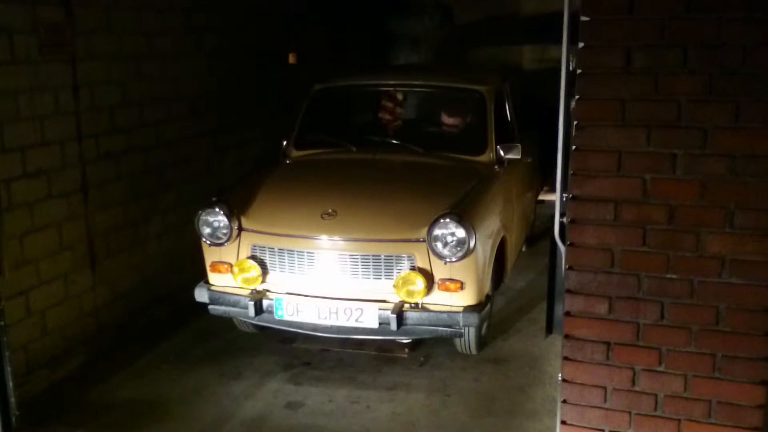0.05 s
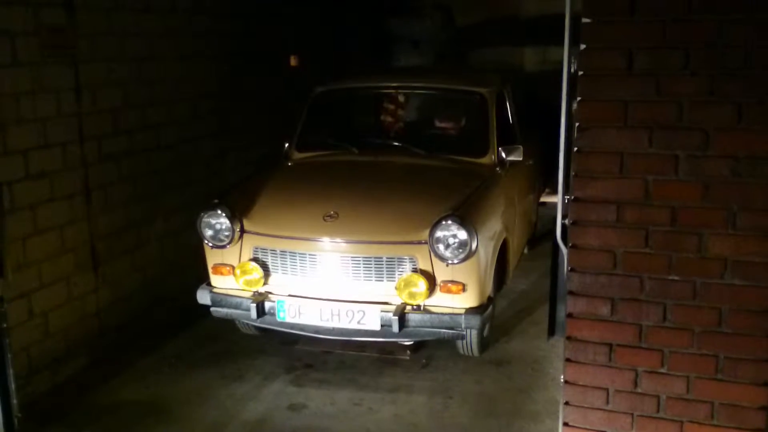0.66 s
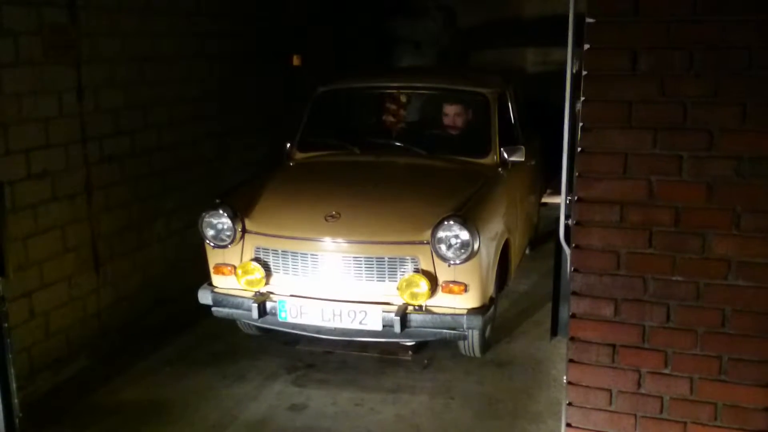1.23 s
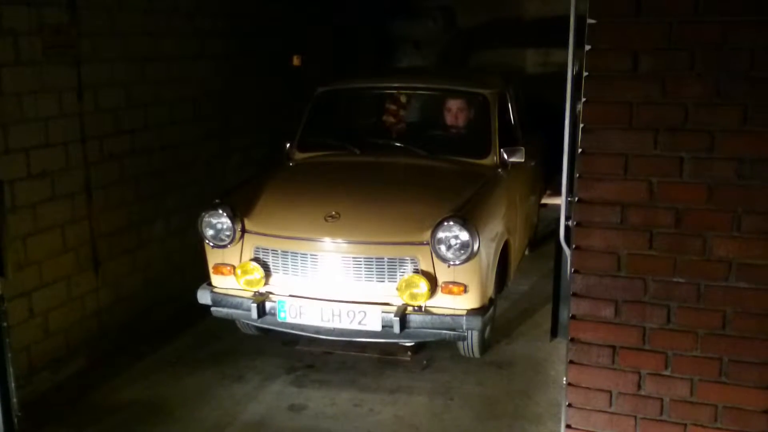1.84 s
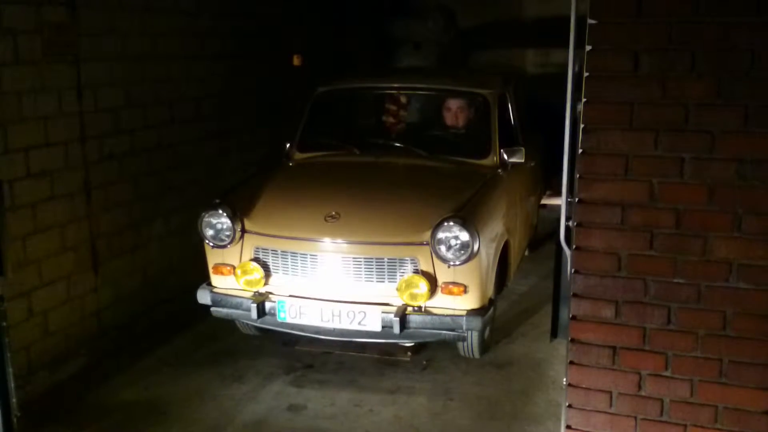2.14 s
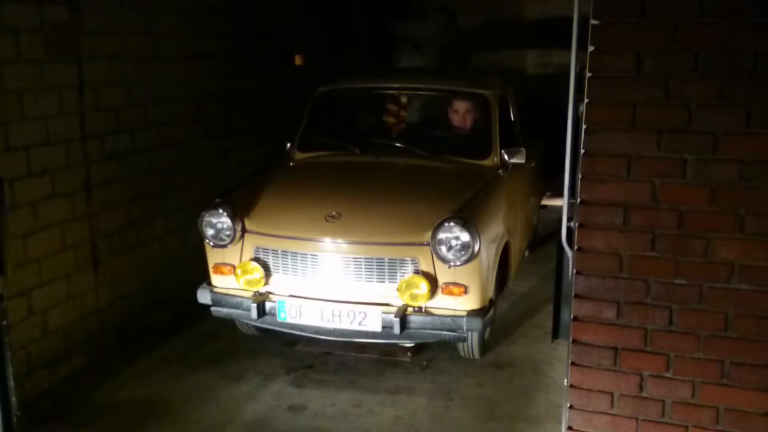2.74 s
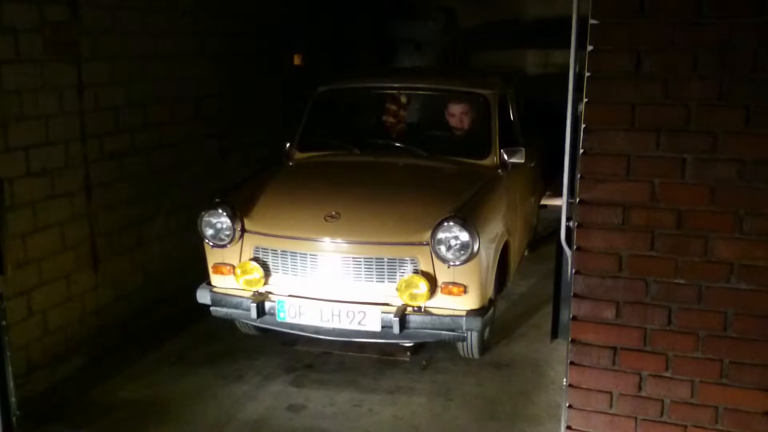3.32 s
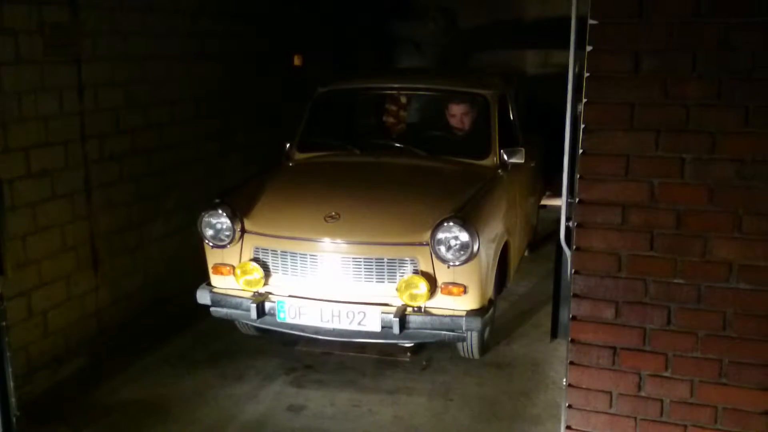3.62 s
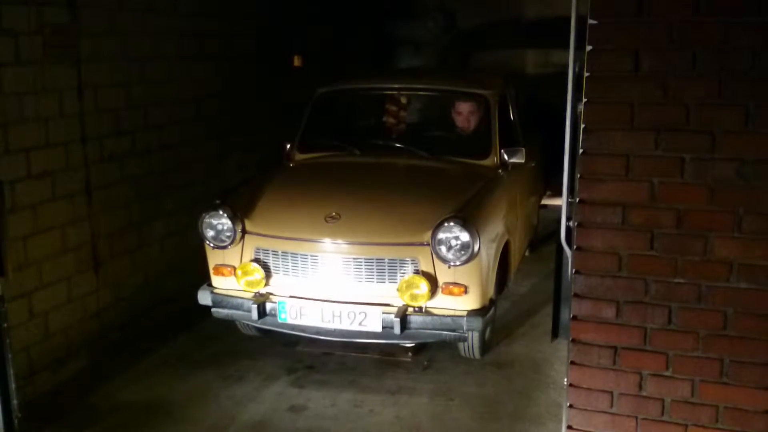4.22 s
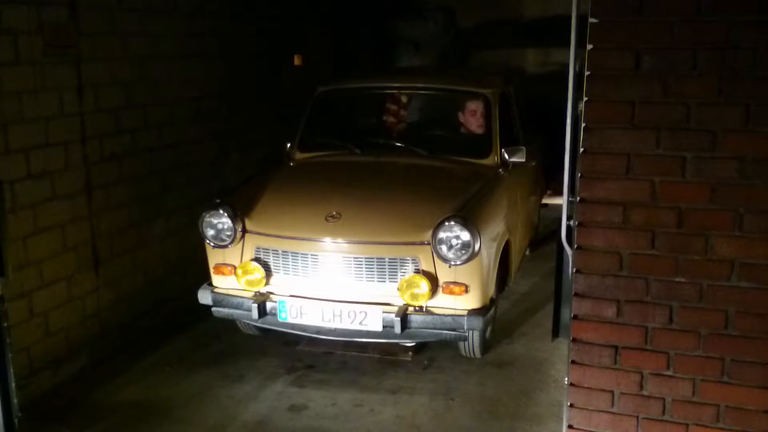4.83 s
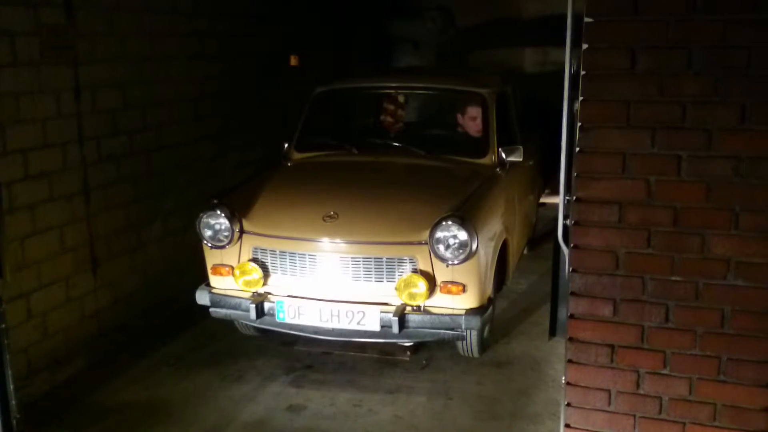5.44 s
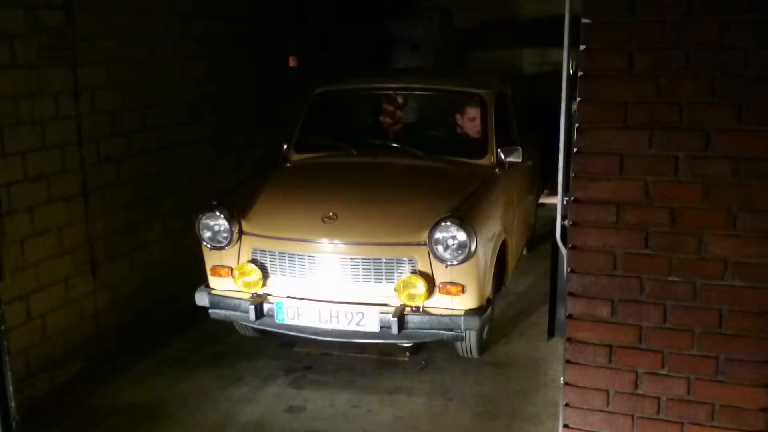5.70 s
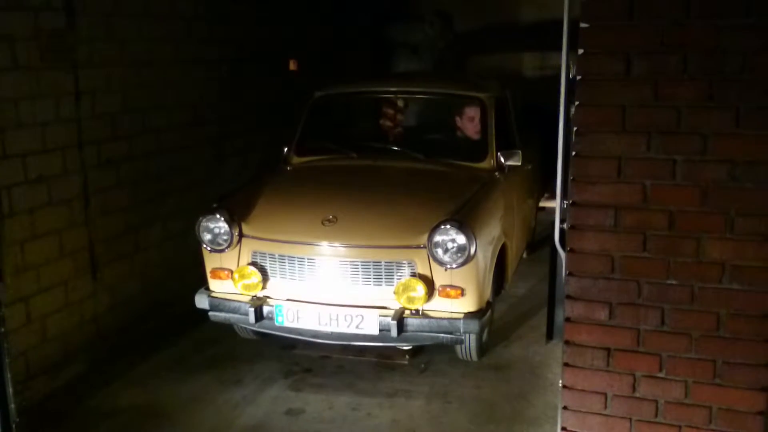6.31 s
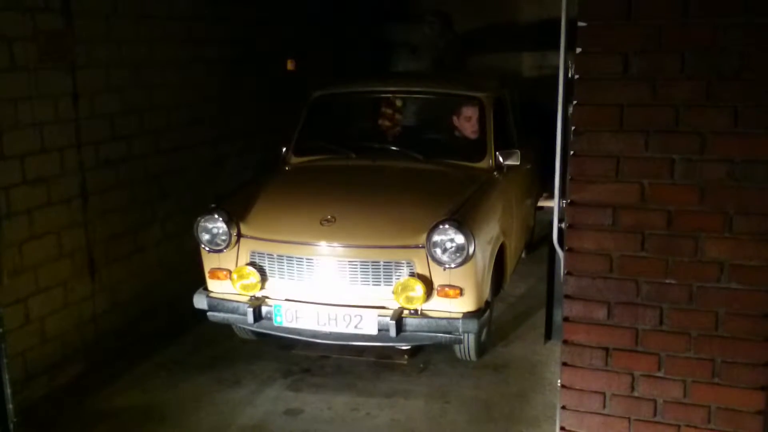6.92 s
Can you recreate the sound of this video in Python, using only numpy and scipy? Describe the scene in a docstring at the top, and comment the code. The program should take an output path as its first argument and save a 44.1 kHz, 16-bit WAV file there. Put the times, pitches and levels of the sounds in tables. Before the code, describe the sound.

A ventilator hums softly in a narrow brick garage. After about two seconds, an old small car's starter clashes and grinds three times in quick succession. The two-stroke engine stumbles and clatters, coughs once, then catches and revs up. It eases back to a fast idle, with irregular firings shaking out short, tinny rattles over the exhaust drone. Heard from nearby, with short reflections off the walls.

```python
"""Two-stroke cold start in a garage

A ventilator hums in a narrow brick garage. A starter crashes in, and an old air-cooled two-stroke twin
stumbles, clatters, catches, revs up and settles to a fast idle. Exhaust pulses, fan tones and rocking
follow the firing rate. Only some strokes ignite: each of those jolts excites the resonances of the
engine's thin metal, a short tinny rattle that reverberates between the walls."""
import sys
import numpy as np
from scipy import signal
from scipy.fft import rfft, irfft
from scipy.io import wavfile
from scipy.ndimage import uniform_filter1d

SR = 44100
rng = np.random.default_rng(int(sys.argv[2]) if len(sys.argv) > 2 else 0)


def transcribe(signal):
    """Save signal, clipped to [-1, 1], as a 16-bit WAV file at the path in sys.argv[1]."""
    frames = np.atleast_2d(signal).T
    limited = np.clip(frames, -1, 1)
    pcm = np.round(limited * 32767).astype(np.int16)
    wavfile.write(sys.argv[1], SR, pcm)


N = 306936
TIME = np.arange(N) / SR
HZ = np.arange(32769) * SR / 65536


def undb(db):
    """Decibels to amplitude ratio."""
    return 10 ** (np.asarray(db) / 20)


def unit(x):
    """Normalisation to rms 1."""
    return x / np.sqrt(np.mean(x ** 2))


def curve(rows):
    """Linear interpolation of (time, value) rows."""
    return np.interp(TIME, *np.transpose(rows))


def burst(start, rise_s, hold_s, fall_s):
    """Linear attack, then exponential decay from hold_s after the start."""
    age = np.maximum(TIME - start, 0)
    return np.minimum(age / rise_s, 1) * np.exp(-np.maximum(age - hold_s, 0) / fall_s)


def drift(rate_hz):
    """Slow random modulation: smoothed steps, rms 1."""
    k = int(SR / rate_hz)
    steps = np.repeat(rng.standard_normal(N // k + 1), k)
    return unit(uniform_filter1d(uniform_filter1d(steps, k), k)[:N])


def impacts(rate_hz, spread_db):
    """Shot noise: random contacts of log-normal strength, rms 1."""
    contacts = (rng.random(N) < rate_hz / SR) * rng.choice([-1, 1], N)
    return unit(contacts * undb(spread_db * rng.standard_normal(N)))


def shape(points, modes=()):
    """Frequency response in dB: Lorentzian resonances on a broad spectrum."""
    hz, db = np.transpose(points)
    broad = np.interp(np.log(HZ + 1), np.log(hz), db)
    return broad + sum(peak / (1 + (2 * (HZ - f) / width) ** 2) for f, width, peak in modes)


def colour(x, db):
    """Minimum-phase filtering, built from the cepstrum of the response."""
    cepstrum = irfft(np.log(undb(db)))
    cepstrum[1:len(HZ) - 1] *= 2
    cepstrum[len(HZ):] = 0
    response = irfft(np.exp(rfft(cepstrum)))[:16384]
    return signal.fftconvolve(x, response)[:N]


def noise(db):
    """Gaussian noise with the given spectrum."""
    return colour(rng.standard_normal(N), db)


def metal(force, db):
    """Forced vibration: contacts ring a metal part, keeping their power."""
    return colour(force, db) / np.sqrt(np.mean(undb(db) ** 2))


def cohere(pair, split_hz):
    """Spatial coherence: long waves reach two close microphones alike."""
    mid, side = rfft(pair)
    alike = 1 / (1 + (np.linspace(0, SR / 2, len(mid)) / split_hz) ** 2)
    mid, side = mid * np.sqrt(1 + alike), side * np.sqrt(1 - alike)
    return irfft([mid + side, mid - side], len(pair[0])) / np.sqrt(2)


def garage(x, direct, early_s, late_s, late_db):
    """Reverberation: direct sound, dense reflections off near walls and a duller tail."""
    t = TIME[:SR // 2]
    early, late = (cohere(rng.standard_normal((2, len(t))), split_hz=1560) for _ in range(2))
    late = signal.sosfilt(signal.butter(1, 4000, fs=SR, output="sos"), late)
    response = early * undb(-60 * t / early_s) + late * undb(late_db - 60 * t / late_s)
    response = unit(response) / np.sqrt(len(t))
    response[:, 0] += direct
    return signal.fftconvolve(x[None], response, axes=1)[:, :N] / np.sqrt(1 + direct ** 2)


# ventilator air spectrum: (frequency [Hz], relative level [dB])
AIR_SPECTRUM = [(25, -2.5), (50, -13.5), (80, -9.5), (130, 3), (170, -10), (300, -13.5), (420, -18.5),
                (720, -19.5), (900, -21), (1150, -20), (1600, -22.5), (2600, -25), (4500, -31),
                (6100, -28.5), (7500, -36.5), (15800, -54)]
# duct resonances: (frequency [Hz], width [Hz], gain [dB])
DUCT_MODES = [(138, 18, -8.5), (840, 36, 12.5), (958, 100, 12.5), (2270, 270, 7), (3460, 480, 6),
              (6000, 1200, 5.5)]
# ventilator tones: (multiple of shaft speed [-], rms level [dB])
HUM_TONES = [(16, -40), (19, -48), (20, -47), (21, -51), (44, -60), (123, -56), (143, -56), (162, -65)]
SHAFT_HZ, AIR_DB, LEFT_LEAD_S = 6.665, -41.5, 0.00021

def ventilator():
    """Beating: neighbouring shaft harmonics throb over broadband flow noise."""
    air = unit(cohere([noise(shape(AIR_SPECTRUM, DUCT_MODES)) for _ in range(2)], split_hz=440))
    shaft_turns = SHAFT_HZ * (TIME + np.array([[LEFT_LEAD_S], [0]]))
    hum = 0
    for k, db in HUM_TONES:
        amplitude = np.sqrt(2) * undb(db + 0.26 * drift(5))
        hum += amplitude * np.sin(2 * np.pi * (k * shaft_turns + rng.random()) + 0.09 * drift(3))
    return air * undb(AIR_DB) + hum


# the engine is turned over briefly, then stumbles at low speed: (time [s], stroke rate [Hz])
STUMBLING_RATE = [(2.05, 5.8), (2.35, 11), (2.85, 12), (3.1, 17), (3.3, 16), (3.48, 19.2)]
# it catches, revs up and settles: (time [s], stroke rate [Hz])
RUNNING_RATE = [(3.55, 31.4), (3.8, 42.77), (4.1, 51.34), (4.33, 70.0), (4.45, 72.34), (4.98, 68.9),
                (5.1, 70.43), (5.47, 67.57), (5.69, 60.5), (6.88, 59.38), (6.96, 58.6)]

def stroke_phase():
    """Phase as the integral of frequency: one cycle per stroke."""
    return np.cumsum(curve(list(STUMBLING_RATE) + list(RUNNING_RATE))) / SR


def stroke_hz(strokes):
    """Instantaneous frequency: the derivative of phase."""
    return np.gradient(strokes) * SR


# one push on the accelerator: (time [s], opening [0-1])
THROTTLE_OPENING = [(3.52, 0.1), (3.6, 0.8), (4.22, 1), (4.5, 0)]
IDLE_HZ = 60

def effort(strokes, idle_db, doubling_db, throttle_db):
    """Power law: level changes by doubling_db per doubling of speed, and rises with throttle."""
    doublings = np.log2(stroke_hz(strokes) / IDLE_HZ)
    return undb(idle_db + doubling_db * doublings + throttle_db * curve(THROTTLE_OPENING))


# narrow, fixed-pitch peaks in the engine's drone: (frequency [Hz], width [Hz], gain [dB])
DRONE_PEAKS = [(178, 14, 4), (352, 14, 5), (416, 14, 9), (484, 20, 4), (555, 22, 5), (595, 30, 4)]
# cooling fan tones: (multiple of stroke rate [-], relative level [dB])
FAN_TONES = [(3, -5), (5, -15), (6, -10), (7, -5.5), (8, 1), (9, -9), (10, -9)]

def fan(strokes):
    """Aerodynamic noise: ragged harmonics of engine speed over the rush in the cooling ducts."""
    tones = unit(sum(undb(db + 4.5 * drift(22)) * np.sin(2 * np.pi * k * strokes + 0.9 * drift(30))
                     for k, db in FAN_TONES))
    rush = unit(noise(shape([(200, -25), (350, -3), (650, -3.5), (780, -14), (1000, -0.5), (2000, -52)])))
    spinning = np.clip((stroke_hz(strokes) - 30) / 25, 0, 1)
    air = tones * spinning + rush * np.maximum(spinning, 0.76)  # only the rush stays at low speed
    air = unit(colour(air, shape([(100, 0), (1000, 0)], DRONE_PEAKS)))
    return air * effort(strokes, idle_db=-36.5, doubling_db=8, throttle_db=4.4)


# jolts of the pinion and of single ignitions: (time [s], relative level [dB], hold [s])
JOLT_EVENTS = [(2.074, -17, 0.0046), (2.243, -20, 0.026), (2.38, -17, 0.013), (2.403, -19.5, 0.026),
               (2.542, -18, 0.01), (2.743, -18.5, .014), (2.936, -22.5, 0.038), (3.03, -16, 0.0069),
               (3.1, -23, 0.048), (3.358, -17, .024), (3.432, -19, .02), (3.546, -15.5, .022),
               (3.592, -17.5, 0.053), (3.713, -16, 0.015), (3.794, -18.5, 0.07), (4.001, -24.5, 0.018),
               (4.081, -20.5, 0.028), (4.571, -12, 0.042), (4.742, -12, 0.023), (4.79, -13, .02),
               (4.922, -11, 0.044), (4.995, -12, 0.042), (5.083, -11, .024), (5.257, -11.5, .043),
               (5.409, -14.5, 0.022), (5.486, -11.5, 0.019), (5.628, -15, 0.019), (5.677, -13.5, 0.017),
               (5.82, -13.5, 0.025), (5.874, -14, 0.015), (5.981, -17.5, 0.021), (6.035, -13.5, 0.018),
               (6.203, -13.5, 0.041), (6.27, -20, 0.02), (6.386, -15.5, 0.018), (6.471, -21, 0.023),
               (6.59, -17.5, 0.018), (6.64, -13.5, 0.019), (6.796, -14.5, .039), (6.93, -17, 0.023)]

def jolt_power(rise_s, fall_s, gain_db):
    """Incoherent addition: the decaying vibrations of the jolts sum in power."""
    return sum((undb(db + gain_db) * burst(start, rise_s, hold_s, fall_s)) ** 2
               for start, db, hold_s in JOLT_EVENTS)


def shaking(strokes):
    """Resonance: the engine sways on its mounts and booms as its rate crosses the body's lowest mode."""
    mounts = shape([(5, -16), (11, 2), (18, 0), (33, 0.5), (48, -20), (110, -17), (400, -53)])
    sway = cohere([noise(mounts) for _ in range(2)], split_hz=16)
    sway /= np.sqrt(uniform_filter1d(sway ** 2, SR // 4))  # stiff mounts keep the swing even
    steady = effort(strokes, idle_db=-35.5, doubling_db=-0.5, throttle_db=1)
    swing = np.sqrt(steady ** 2 + jolt_power(rise_s=0.027, fall_s=0.17, gain_db=-20.5))
    swing *= np.clip((TIME - STUMBLING_RATE[0][0]) / 0.5, 0.6, 1)
    boom = np.sin(2 * np.pi * strokes) / (1 + ((stroke_hz(strokes) - 35) / 11) ** 2)
    return sway * swing + boom * effort(strokes, idle_db=-29, doubling_db=0.2, throttle_db=7.2)


# exhaust response: (frequency [Hz], relative gain [dB])
SILENCER_RESPONSE = [(40, -34.5), (95, -5.5), (135, 6), (180, 3), (215, 1), (300, -5.5), (420, -13),
                     (700, -5.5), (1500, -46.5)]

def exhaust(strokes):
    """Source and filter: uneven puffs and turbulent gas drive the silencer; slow strokes only chuff."""
    rate_hz = stroke_hz(strokes)
    puffs = np.diff(np.floor(strokes), prepend=0) * undb(5.1 * drift(90))
    puffs = unit(puffs / np.sqrt(rate_hz / SR + 1e-5))  # equal power at any speed
    gas = unit((0.57 + np.exp(-(strokes % 1) / 0.99)) * rng.standard_normal(N))
    flow = np.clip(rate_hz / 55, 0, 1) * puffs + 1.02 * gas
    boom = unit(colour(flow, shape([(35, -22), (62, 11), (80, 8), (105, -7), (200, -35)])))
    pipe = unit(colour(flow, shape(SILENCER_RESPONSE, DRONE_PEAKS)))
    # unburnt mixture goes off once in the silencer
    cough = undb(-31.5) * burst(2.99, rise_s=0.02, hold_s=0.16, fall_s=0.025)
    pipe *= effort(strokes, idle_db=-38.5, doubling_db=0.88, throttle_db=9.7) + undb(-13) * cough
    boom *= effort(strokes, idle_db=-45, doubling_db=0.3, throttle_db=8) + cough
    build_up = np.clip((TIME - STARTER_HEAVES[1][0]) / 0.39, 0, 1)
    return build_up * (pipe + boom)


# the starter heaves over the first compressions: (time [s], scrape [dB], clash [dB], grinding [dB])
STARTER_HEAVES = [(2.045, -26, -12, -23.5), (2.241, -33, -14.5, -27.5), (2.378, -45, -16, -25.5)]

def pinion():
    """Sliding friction: tooth tips skid on each other with a thin, bright scrape."""
    force = sum(undb(db) * burst(start, rise_s=0.011, hold_s=0.016, fall_s=0.031)
                for start, db, _, _ in STARTER_HEAVES)
    tips = shape([(1000, -3), (5000, -1), (9000, -6), (15000, -12)])
    scrape = metal(force * impacts(rate_hz=3300, spread_db=4.5), tips)
    return garage(scrape, direct=0.41, early_s=0.046, late_s=0.3, late_db=-11)


def starter_load(play_s=0.029):
    """Backlash: on each heave the teeth take up their play, clash once and grind on under load."""
    power = 0
    for start, _, clash_db, grind_db in STARTER_HEAVES:
        bite = start + play_s
        take_up = undb(grind_db - 4) * burst(start, rise_s=play_s, hold_s=play_s, fall_s=0.021)
        clash = undb(clash_db) * burst(bite, rise_s=0.0053, hold_s=0.0053, fall_s=0.011)
        grind = undb(grind_db) * burst(bite, rise_s=0.036, hold_s=0.1, fall_s=0.021)
        power += take_up ** 2 + clash ** 2 + grind ** 2
    return np.sqrt(power)


# starter housing response: (frequency [Hz], relative gain [dB])
HOUSING_RESPONSE = [(100, -14), (300, -12), (700, -11.5), (1700, -4), (2150, -10), (2800, -2), (4500, -1.5),
                    (5800, -3.5), (7000, -14), (14000, -37)]
# its resonances: (frequency [Hz], width [Hz], gain [dB])
HOUSING_RESONANCES = [(465, 70, 3), (640, 70, 6), (960, 80, 7), (1320, 170, 11), (3300, 200, 4),
                      (3560, 220, 5), (3870, 130, 3)]

def starter(count=3):
    """Structure-borne sound: the pinion strikes the ring gear and the housing radiates all round."""
    load = starter_load()
    housing = shape(HOUSING_RESPONSE, HOUSING_RESONANCES)
    sides = [metal(load * impacts(rate_hz=1200, spread_db=9), housing) for _ in range(count)]
    heard = sum(garage(x, direct=0.35, early_s=0.067, late_s=0.57, late_db=-11.5) for x in sides)
    return heard / np.sqrt(count)


# sheet-metal cowl response: (frequency [Hz], relative gain [dB])
COWL_RESPONSE = [(100, -14), (170, -4.5), (270, -10), (400, -1), (650, 2), (780, -6.5), (1000, 0),
                 (1300, -12), (2000, -40)]

def cowl():
    """Panel radiation: the cowl gives a dull clunk with each jolt and each heave of the starter."""
    knocks = np.sqrt(jolt_power(rise_s=0.0051, fall_s=0.036, gain_db=-20))
    return (knocks + undb(-16.5) * starter_load()) * unit(noise(shape(COWL_RESPONSE)))


# steady mechanical clatter: (time [s], relative level [dB])
CLATTER_LEVEL = [(2.22, -36), (2.45, -22), (3.6, -21.5), (3.85, -19.5), (4.05, -23), (4.38, -15),
                 (4.47, -26), (5.2, -25), (5.8, -27), (6.96, -28.5)]
# part played by slack gears at low speed: (time [s], share of power [0-1])
SLACK_SHARE = [(2.3, 1), (2.5, 0.9), (3.4, 0.88), (3.85, 0.4), (4.1, 0)]
# responses of bearings and pistons, tinware and slack gears: (frequency [Hz], relative gain [dB])
BEARING_RESPONSE = [(300, -6.5), (620, 1.5), (780, -5.5), (1050, -5), (1350, -3.5), (2500, -4.5),
                    (3500, -6.5), (4800, -7), (5900, -1.5), (7000, -12), (10500, -21), (12300, -21.5),
                    (15800, -34)]
TIN_RESPONSE = [(300, -7.5), (500, -8), (650, -2), (870, -13.5), (1030, -4.5), (1180, -12.5), (1450, -4),
                (1750, -7), (3000, -4), (4800, -7.5), (5900, -3), (7000, -12.5), (12000, -20), (15800, -30)]
GEAR_RESPONSE = [(180, -48), (300, -6.5), (622, -3.5), (734, -5.5), (1040, -3), (1400, -5.5), (1890, -3),
                 (3160, -0.5), (3730, 2.5), (6030, -2.5), (6880, -12), (12300, -17.5), (15800, -37)]
# their resonances: (frequency [Hz], width [Hz], gain [dB])
BEARING_RESONANCES = [(970, 140, 2), (1930, 110, 6), (2500, 140, 4)]
TIN_RESONANCES = [(1395, 50, 4), (1500, 70, 4), (1978, 110, 12), (2570, 60, 3), (3240, 90, 3),
                  (3740, 130, 3), (4400, 200, 2)]
GEAR_RESONANCES = [(1046, 110, 2), (1915, 90, 6), (2345, 65, 9), (2520, 140, 4), (3610, 90, 3),
                   (3850, 60, 4), (4590, 90, 4)]

def rattle(strokes, count=4):
    """Impact excitation: parts tick on every stroke and chatter after jolts, each with its own echoes."""
    depth = np.clip(stroke_hz(strokes) / IDLE_HZ, 0, 1)  # strokes hit harder with speed
    pulsing = unit(1.5 + depth * np.exp(-(strokes % 1) / 1.2))
    level = undb(curve(CLATTER_LEVEL) + 0.95 * drift(45)) * (TIME > CLATTER_LEVEL[0][0])
    shaken = np.sqrt(jolt_power(rise_s=0.001, fall_s=0.02, gain_db=0.5))
    slack = curve(SLACK_SHARE)
    thin = shape([(150, -8.5), (500, -6), (1100, 1.5)])  # thin metal radiates little bass
    bearings = shape(BEARING_RESPONSE, BEARING_RESONANCES) + thin
    tin = shape(TIN_RESPONSE, TIN_RESONANCES) + thin
    gears = shape(GEAR_RESPONSE, GEAR_RESONANCES) + thin
    heard = 0
    for _ in range(count):
        ticks = level * pulsing * impacts(rate_hz=600, spread_db=4)
        chatter = shaken * impacts(rate_hz=1900, spread_db=2)
        ring = metal(ticks * np.sqrt(1 - slack), bearings)
        ring += metal(chatter * np.sqrt(1 - slack), tin)
        ring += metal((ticks + chatter) * np.sqrt(slack), gears)
        heard += garage(ring, direct=0.42, early_s=0.078, late_s=0.31, late_db=-10)
    return undb(-0.5) * heard / np.sqrt(count)


def scene():
    """Superposition: starter, ventilator and an engine whose periodic voices share one crankshaft."""
    strokes = stroke_phase()
    turning = np.clip((TIME - STUMBLING_RATE[0][0]) / 0.06, 0, 1)
    engine = rattle(strokes) + cowl() + turning * (exhaust(strokes) + shaking(strokes) + fan(strokes))
    return pinion() + starter() + engine + ventilator()


# microphone imbalance: (frequency [Hz], left minus right [dB])
MIC_IMBALANCE = [(40, -8.7), (110, -3.1), (400, 0.4), (750, -2.4), (1300, -5.9), (2300, -9.8), (3400, -6.2),
                 (4600, -6.7), (5900, -10.8), (7300, 3.9), (9000, 6.3), (10500, 9.0), (12500, 10.5),
                 (15000, -1.7)]
TOP_HZ = 15700

def record(dry):
    """Transduction: two microphones of unlike response, soft saturation and a steep low-pass."""
    lean_db = shape(MIC_IMBALANCE)
    common_db = -20 * np.log10(np.cosh(lean_db * np.log(10) / 40))  # keeps the mean of both gains at 1
    pair = np.array([colour(dry[0], common_db + lean_db / 2), colour(dry[1], common_db - lean_db / 2)])
    saturated = np.tanh(0.85 * pair) / 0.85
    return signal.sosfilt(signal.ellip(10, 0.2, 80, TOP_HZ, fs=SR, output="sos"), saturated)


dry = scene()
out = record(dry)
transcribe(out)
```